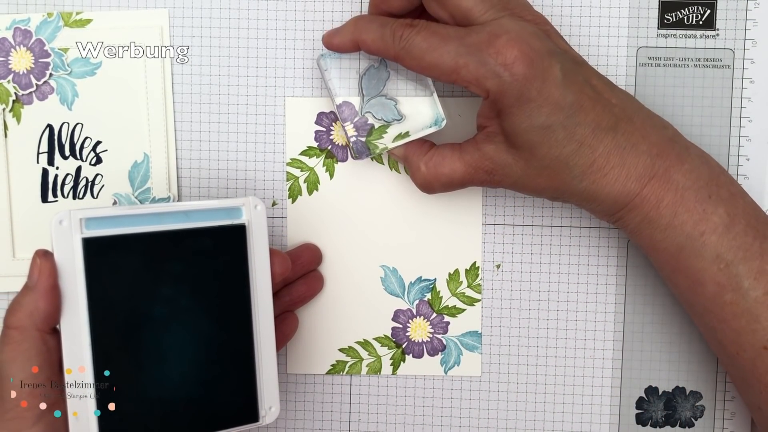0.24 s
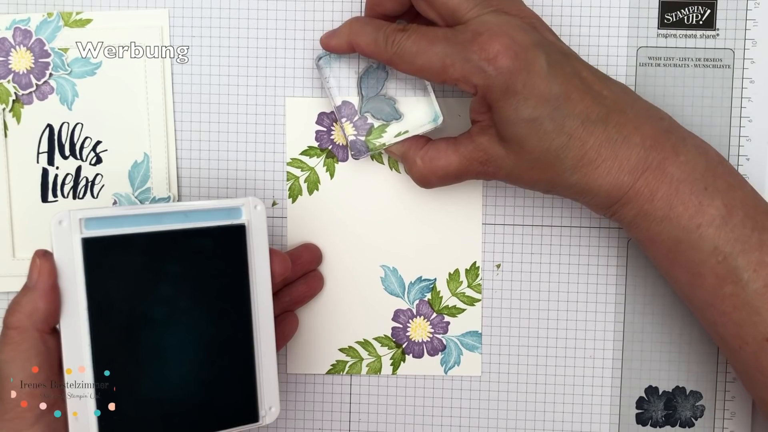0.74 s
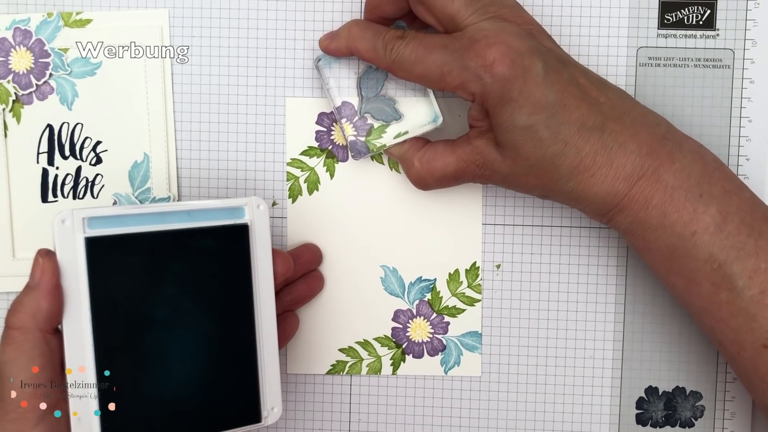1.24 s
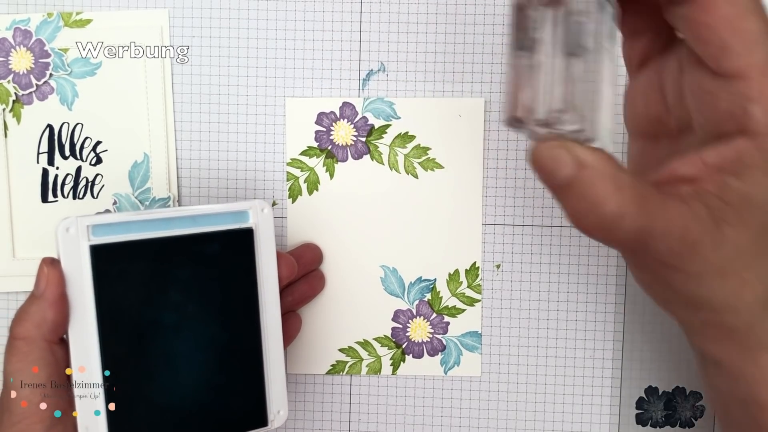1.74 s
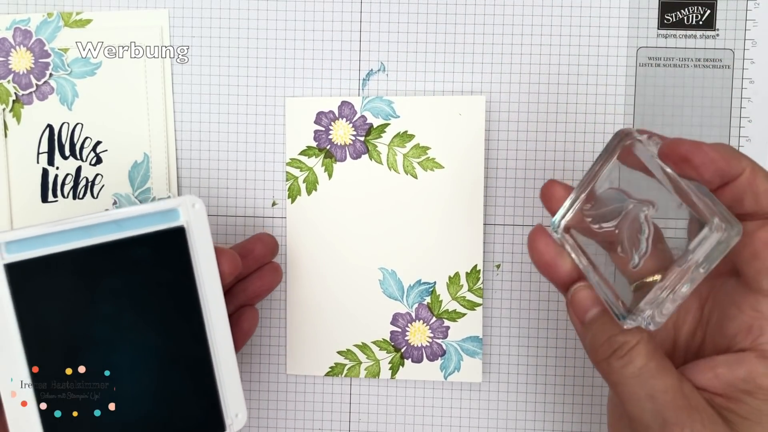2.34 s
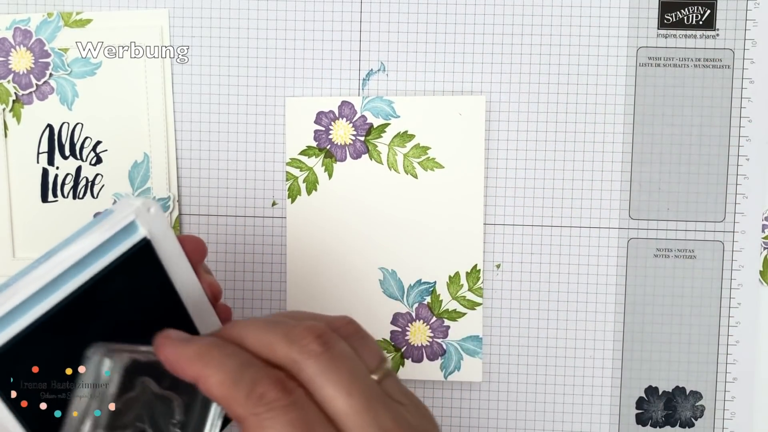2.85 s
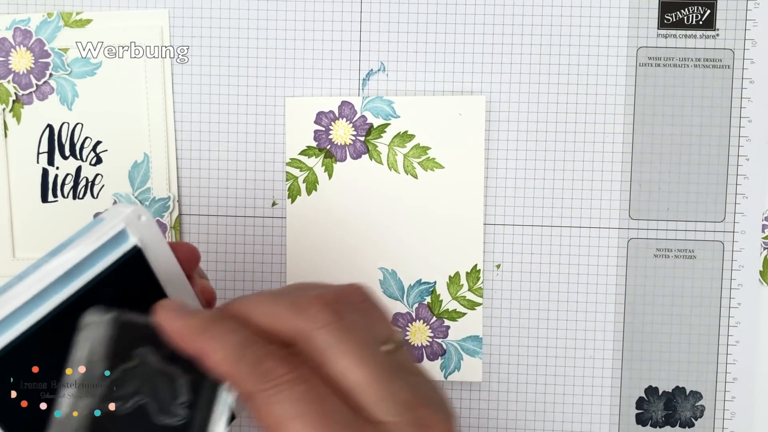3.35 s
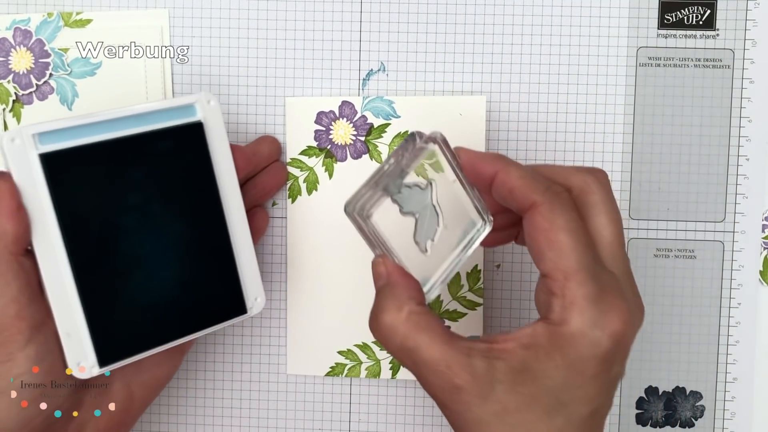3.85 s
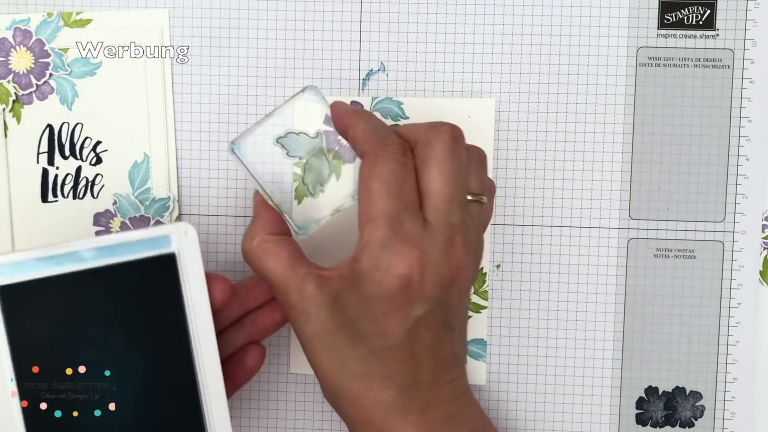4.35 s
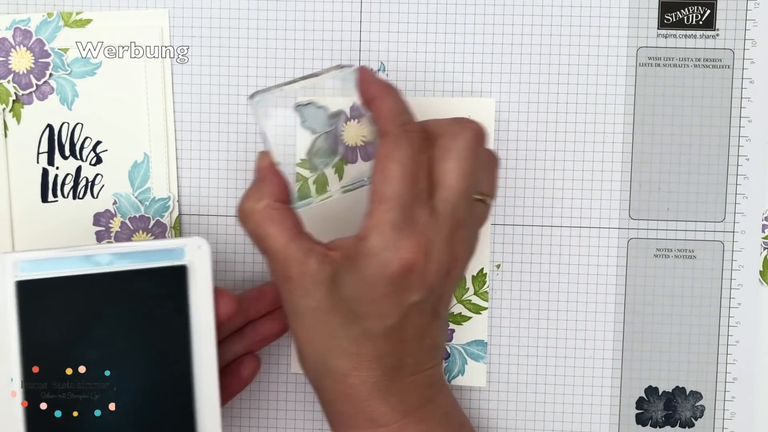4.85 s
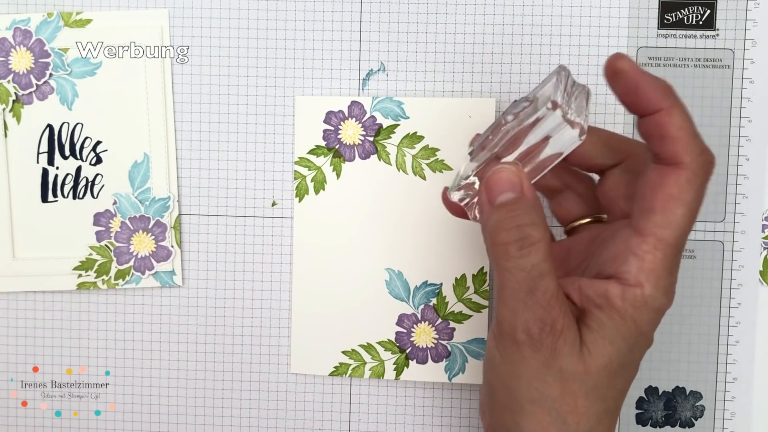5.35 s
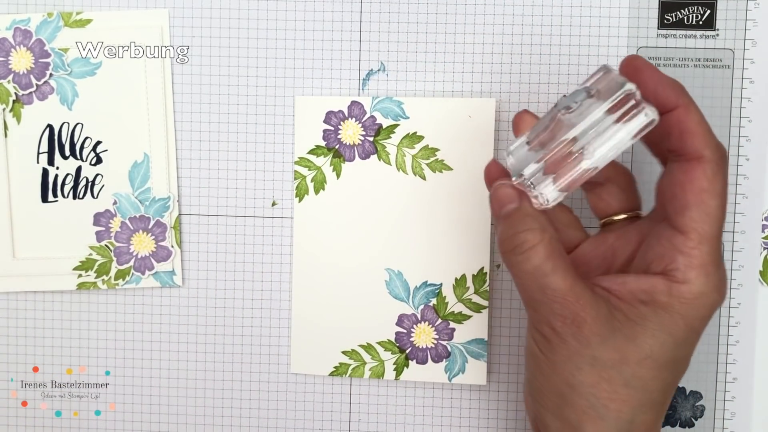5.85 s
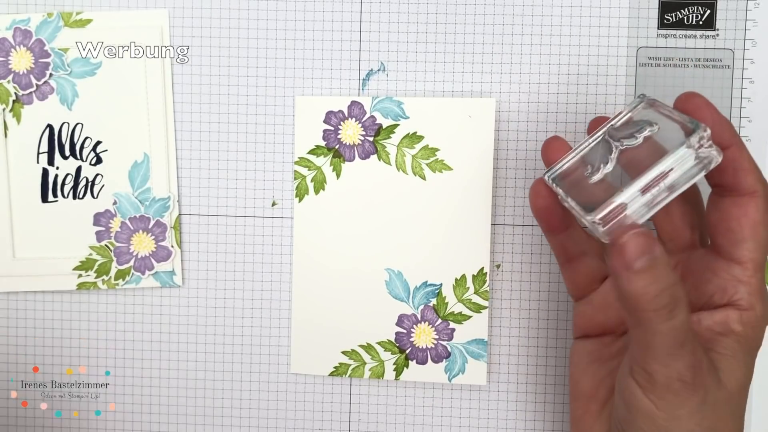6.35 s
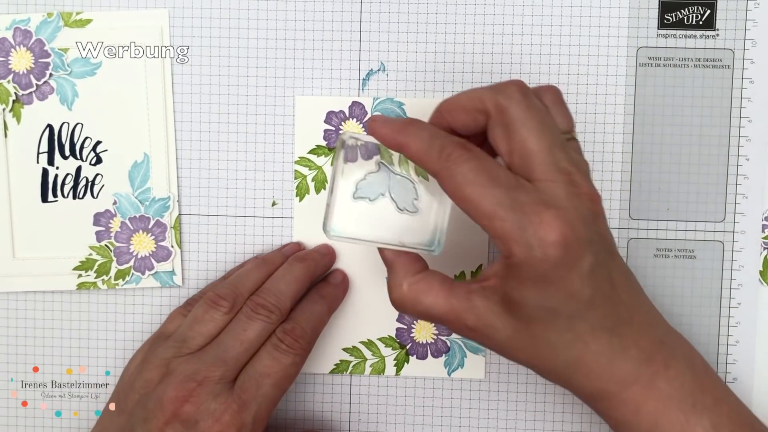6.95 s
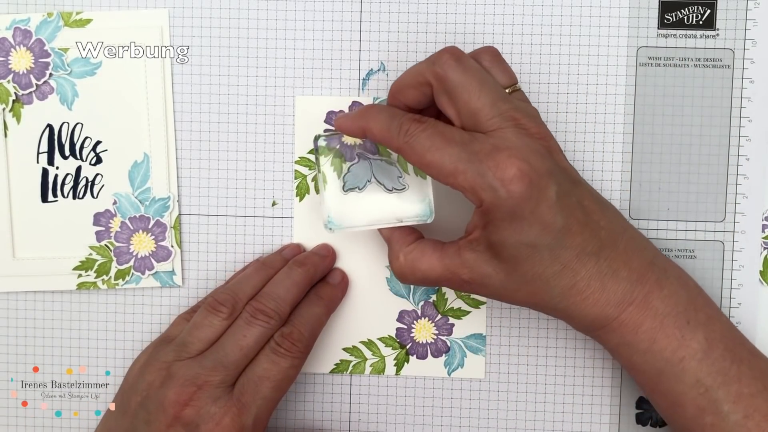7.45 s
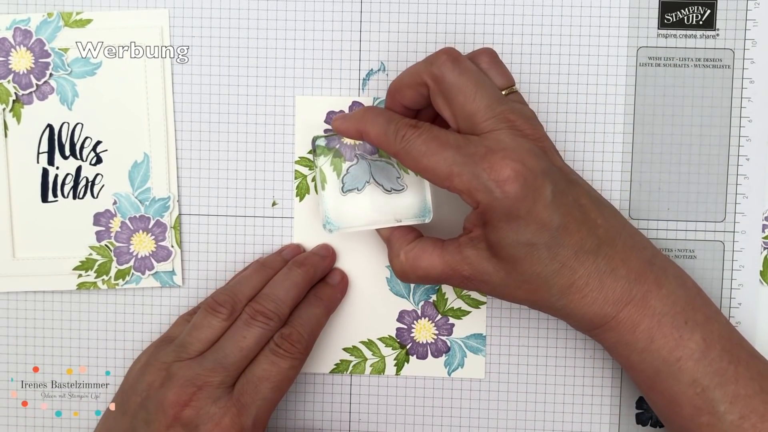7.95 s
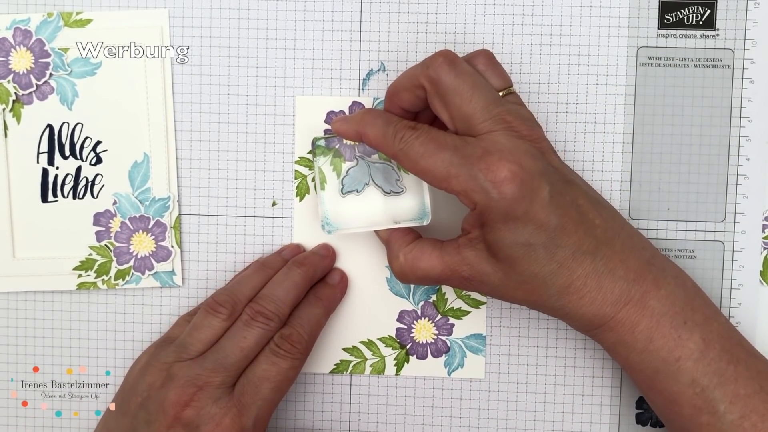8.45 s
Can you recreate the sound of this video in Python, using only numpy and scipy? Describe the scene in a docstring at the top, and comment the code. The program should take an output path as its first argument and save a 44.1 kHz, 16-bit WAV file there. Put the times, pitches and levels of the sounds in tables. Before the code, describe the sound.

A stamp block faintly taps and unsticks, then a plastic ink pad case is put down with knocks and a sharp clack.

```python
"""Rubber stamping at a craft table

A small, quiet room. Close to the microphone, a clear acrylic stamp block is peeled off cardstock,
dabbed on an ink pad and pressed down again. Further off, the plastic pad case is put aside with a few
knocks and one sharp clack, which run through the table top as bending waves, treble first."""
import sys
import numpy as np
from scipy import signal
from scipy.fft import rfft, irfft
from scipy.io import wavfile
from scipy.ndimage import uniform_filter1d

SR = 44100
rng = np.random.default_rng(int(sys.argv[2]) if len(sys.argv) > 2 else 0)


def store_wav(level_fs):
    """Save 16-bit WAV to argv[1]."""
    pcm = np.round(np.clip(np.atleast_2d(level_fs), -1, 1) * 32767)
    wavfile.write(sys.argv[1], SR, pcm.T.astype(np.int16))


N = 383348
TOP_HZ, MS = 15850, 1e-3
SIZE = 16384  # samples in which one blow is shaped
FREQ = np.maximum(np.arange(SIZE // 2 + 1) * SR / SIZE, 1)
AGE = np.arange(SIZE) / SR

# the tacky stamp lets go of the card: start_s, level_db
PEEL_SNAPS = [(1.5385, -58), (1.5935, -58), (1.5966, -48.5), (1.6009, -50), (1.6046, -30)]


def undb(db):
    """Decibels to gain."""
    return 10 ** (np.asarray(db) / 20)


def along(hz, points, values):
    """Join values by straight lines on a log-frequency axis."""
    return np.interp(np.log(hz), np.log(points), values)


def resonance(hz, width):
    """Response of one damped mode, gain 1 at its centre."""
    return 1 / (1 + 1j * (FREQ * FREQ - hz * hz) / (FREQ * width))


def body(modes):
    """Response of an object: its modes add in power, and it rings only after the blow."""
    power = sum(np.abs(undb(db) * resonance(hz, width)) ** 2 for hz, width, db in modes)
    cepstrum = irfft(np.log(power))
    return np.exp(rfft(cepstrum[:SIZE // 2], SIZE) - cepstrum[0] / 2)  # minimum phase


def bending(travel_ms):
    """Path through the table: delay falls as 1 / sqrt(f), scaled by travel_ms, and is zero at TOP_HZ."""
    khz, top_khz = FREQ / 1000, TOP_HZ / 1000
    return np.exp(-2j * np.pi * travel_ms * (2 * np.sqrt(khz) - khz / np.sqrt(top_khz)))


def contact(ms, rough):
    """Force spectrum of a touch: one push and a dying crackle of smaller ones, even across the bands."""
    crackle = rng.standard_normal(SIZE) * np.exp(-AGE / (ms * MS))
    force = 1 + rough * rfft(crackle / np.linalg.norm(crackle))
    return force / np.sqrt(uniform_filter1d(np.abs(force) ** 2, size=300))


def add(track, start_s, db, spectrum):
    """Place one blow; its level is its energy spread over 10 ms."""
    blow = irfft(spectrum)[:SIZE // 2]
    blow = blow * undb(db) * np.sqrt(10 * MS * SR) / np.linalg.norm(blow)
    start = int(start_s * SR)
    track[start:start + len(blow)] += blow[:N - start]


def tick(hz, width, ms):
    """Spectrum of a small, heavily damped click whose crackle decays over ms."""
    return resonance(hz, width) * resonance(hz, 1.5 * width) * contact(ms, rough=min(ms, 6))


def thump(hz, width):
    """Spectrum of rubber on card or foam: only the low bending waves are set going."""
    return resonance(hz, width) ** 2 * resonance(hz, 6.4 * hz) * bending(travel_ms=3.43)


def friction(start_s, end_s, db, hz, width):
    """Faint grainy friction that swells and fades with one movement."""
    out = np.zeros(N)
    count = max(int((end_s - start_s) * SR), 2)
    grains = rng.standard_normal(SIZE) * undb(3 * rng.standard_normal(SIZE))
    rub = irfft(rfft(grains) * resonance(hz, width) * resonance(hz, 4 * width))
    swell = np.sqrt(np.hanning(count))
    out[int(start_s * SR):][:count] = undb(db) * np.resize(rub / rub.std(), count) * swell
    return out


def room_tone(level_db=-64):
    """Steady low noise of the still room under an even microphone hiss."""
    # shape of the noise floor: frequency_hz, relative_density_db
    floor_shape = [(15, -44), (25, -14.5), (52, -3.5), (102, -1.5), (161, -0.5), (200, -3), (284, -2.5),
                   (316, -3.5), (382, -4), (542, -6.5), (691, -10), (1120, -14), (1430, -17), (9720, -23.5),
                   (15800, -28.5)]
    f = np.maximum(np.arange(N // 2 + 1) * SR / N, 1)
    colour = undb(along(f, *np.transpose(floor_shape)))
    noise = irfft(rfft(rng.standard_normal(N)) * colour, N)
    return undb(level_db) * noise / noise.std()


def reflections(send, gap_ms=1.6, build_ms=1.3):
    """Dense reflections of the small room build up after a short gap; the treble dies first."""
    # the room's answer: frequency_hz, level_against_send_db, t60_s
    room_decay = [(39.87, -12, 0.34), (69.4, -0.5, .36), (256, 0, 0.5), (624, -4, .40), (1430, -1.5, .48),
                  (3200, -7.5, .42), (6004, -9, .34), (9000, -12.5, 0.24), (14920, -15.5, .22)]
    hz, db, t60 = np.transpose(room_decay)
    age = np.arange(2 * SIZE) / SR
    f = np.arange(SIZE + 1) * SR / (2 * SIZE)
    noise = rfft(rng.standard_normal(2 * SIZE))
    edges = np.geomspace(30, TOP_HZ, 37)
    onset = 1 - np.exp(-np.maximum(age - gap_ms * MS, 0) / (build_ms * MS))
    echo = 0
    for lo, hi in zip(edges, edges[1:]):
        centre = np.sqrt(lo * hi)
        band_noise = irfft(noise * ((f >= lo) & (f < hi)))
        # reflections are so many that each band dies away evenly
        wash = np.cos(np.angle(signal.hilbert(band_noise)))
        band = wash * onset * np.exp(-np.log(1000) * age / along(centre, hz, t60))
        gain = np.sqrt(2 * (hi - lo) / SR) * undb(along(centre, hz, db))
        echo = echo + gain * band / np.linalg.norm(band)
    return signal.fftconvolve(send, echo)[:N]


def slides():
    """Skin hisses over a broad band and stirs the paper; the scraping case sounds in a narrow band."""
    # skin on block, card and paper mat: start_s, end_s, level_db, centre_hz
    skin_slides = [(1.717, 2.044, -71.5, 3200), (2.459, 2.74, -72, 1500), (2.623, 2.68, -64, 13000),
                   (3.71, 3.8, -68, 4200), (3.916, 4.045, -68.5, 2700), (4.674, 5.01, -69.5, 3200),
                   (5.085, 5.396, -63, 6800), (5.467, 5.973, -63, 6000), (6.729, 6.80, -64.5, 10000),
                   (7.17, 7.33, -67, 5500), (7.384, 7.58, -61.5, 6000)]
    # the pad case scrapes: start_s, end_s, level_db, centre_hz
    case_scrapes = [(3.709, 3.813, -63, 484), (5.59, 5.778, -47, 1649), (5.98, 6.041, -42, 523)]
    out = np.zeros(N)
    for start, end, db, hz in skin_slides:
        skin = friction(start, end, db, hz, width=2.1 * hz)
        paper = friction(start, end, db - 11.5, hz=1700, width=550)
        out += skin + paper
    for start, end, db, hz in case_scrapes:
        out += friction(start, end, db, hz, width=.45 * hz)
    return out


def handling_ticks():
    """The block ticks against card and fingers; the case clicks and its hollow shell answers."""
    # light contacts of the acrylic block: start_s, level_db, centre_hz, width_hz, crackle_ms
    block_ticks = [(1.539, -58.5, 1400, 900, 4), (1.801, -63.5, 1390, 2800, 2.7),
                   (1.978, -62, 2750, 2500, 17), (2.085, -59.5, 3500, 3000, 1.3),
                   (4.6682, -45, 3400, 6500, 0.92), (4.858, -63.5, 1100, 2000, 8),
                   (6.8453, -64, 5700, 1600, 2), (6.846, -56, 2200, 900, 3), (6.868, -60, 2080, 1300, 2.7),
                   (6.949, -64.5, 10000, 3500, 2)]
    # the pad case in the hand: start_s, level_db, click_hz, shell_hz, crackle_ms
    case_clicks = [(3.7064, -55, 5500, 1490, 9.4), (5.2111, -50.5, 9400, 1300, 2.6),
                   (5.2812, -57.5, 7500, 850, 2.5)]
    out = np.zeros(N)
    for start, db, hz, width, ms in block_ticks:
        add(out, start, db, tick(hz, width, ms))
    for start, db, click_hz, shell_hz, ms in case_clicks:
        add(out, start, db, tick(click_hz, width=10000, ms=ms))
        add(out, start, db - 2, tick(shell_hz, width=700, ms=1.2 * ms))
    return out


def soft_landings(relative_width=.38):
    """Presses thud through the table, and the card drops back once the stamp has let go."""
    # soft landings and presses: start_s, level_db, centre_hz
    presses = [(.851, -59.5, 400), (.864, -56.5, 362), (.915, -60, 400), (.947, -54, 374),
               (1.145, -53, 440), (3.705, -54, 417), (4.726, -53, 444), (4.917, -54.5, 320),
               (4.934, -54, 278), (6.872, -42, 442)]
    # the freed card settles: after_last_snap_s, level_db, centre_hz
    card_drops = [(0, -52.5, 263), (.004, -45, 450), (.013, -48.5, 470)]
    out = np.zeros(N)
    for start, db, hz in presses:
        add(out, start, db, thump(hz, relative_width * hz))
    last_snap_s = PEEL_SNAPS[-1][0]
    for lag, db, hz in card_drops:
        add(out, last_snap_s + lag, db, thump(hz, relative_width * hz))
    return out


def inking():
    """Each dab lands with a wet tick and a thud, then lifts with a tacky crackle and a snap."""
    # the stamp on the ink pad: press_s, press_db, lift_s, lift_db, snap_hz
    dabs = [(2.967, -51.5, 3.0726, -54.5, 1510), (3.157, -54, 3.266, -56, 950),
            (3.314, -60, 3.412, -55.5, 1010)]
    out = np.zeros(N)
    for dab, (press, press_db, lift, lift_db, snap_hz) in enumerate(dabs):
        wet_db = -55 - 3.5 * dab  # softer with each dab
        add(out, press, wet_db, tick(hz=1000, width=1020, ms=3.4))
        add(out, press, press_db, thump(hz=323, width=220))  # thud in the foam
        add(out, press, press_db + 1.5, thump(hz=83, width=44))  # boom in the table
        add(out, lift, lift_db, tick(snap_hz, width=1.02 * snap_hz, ms=3.7))
        # the ink crackles as it stretches before the snap and releases after it
        out += friction(lift - .024, lift + .017, lift_db - 6.5, snap_hz, width=1.4 * snap_hz)
    return out


def peel():
    """The stamp unsticks in a quick run of snaps -> (sound at the microphone, send to the room)."""
    # block and card as they part: mode_hz, width_hz, relative_db
    block_modes = [(1180, 150, -12.5), (1690, 110, -12), (2810, 180, -4), (3250, 400, -5), (3950, 220, -9),
                   (5720, 280, -7), (6670, 230, -6.5), (9110, 1000, -16.5), (12600, 1700, -18)]
    block = body(block_modes)
    snap = block * bending(travel_ms=1.42)
    direct, send = np.zeros(N), np.zeros(N)
    for start, db in PEEL_SNAPS:
        add(direct, start, db, snap * contact(ms=2.2, rough=1.1))
        add(send, start, db, snap)
    return direct, send


def pad_case(spot_db=5.5):
    """Each knock rings the plastic case and the table -> (sound at the microphone, send to the room)."""
    # the case meets the table: start_s, level_db, contact_corner_hz, spot_resonance_hz, bass_shelf_db
    knocks = [(5.5567, -18, 2597, 780.4, -10), (5.5787, -28.5, 3200, 1500, -11.5),
              (5.6924, -29.5, 1150, 551.6, -8.5), (5.7206, -34, 1000, 1645, -8),
              (5.794, -33.5, 6000, 7900, -7), (5.7995, -28.5, 500, 620, -7),
              (5.9265, -54.5, 2500, 2996, -4.5), (5.976, -38, 800, 461.8, -5.5),
              (6.0125, -36, 1200, 840, -5.5), (6.0267, -35.5, 1697, 1306, -5),
              (6.0383, -7, 7500, 3420, -.5), (6.0803, -16, 7000, 1600, -6)]
    # case and table top together: mode_hz, width_hz, relative_db
    case_modes = [(67.4, 12, -1.5), (125, 31, 0.5), (245.6, 70, 1), (306.3, 28, -0.5), (460, 90, -4.5),
                  (620, 190, -1), (790, 160, 0), (1077, 90, -2), (1300, 120, -3), (1490, 130, -1.5),
                  (1850, 240, -3.5), (2227, 260, -5.5), (2740, 360, -4), (3130, 330, -3), (3857, 190, -4.5),
                  (4320, 280, -6), (4860, 310, -7), (5460, 730, -3), (6340, 830, -12), (7300, 600, -8.5),
                  (8345, 1100, -4.5), (10100, 460, -9.5), (11900, 1200, -7.5), (13990, 2500, -13)]
    case = body(case_modes)
    direct, send = np.zeros(N), np.zeros(N)
    for start, db, corner_hz, spot_hz, bass_db in knocks:
        # a harder contact is brighter, and each spot favours its own resonance
        push = 1 / (1 + 1j * FREQ / corner_hz) / (1 + 1j * FREQ / (3 * corner_hz))
        spot = 1 + (undb(spot_db) - 1) * resonance(spot_hz, 0.19 * spot_hz)
        weight = 1 + (undb(bass_db) - 1) / (1 + 1j * FREQ / 400)
        blow = case * push * spot * weight
        path = bending(travel_ms=4.4 + 0.2 * bass_db)  # a heavier, bassier landing draws its thud out
        # the shell cracks at once; the lows come later, through the table
        shell = contact(ms=2.7, rough=1.0) * (1j * FREQ / (1j * FREQ + 900)) ** 2
        table = path * contact(ms=7.9, rough=.35) / (1 + 1j * FREQ / 2400)
        add(direct, start, db, blow * (table + undb(-3.5) * shell))
        add(send, start, db, blow * path)
    return direct, send


def scene():
    """The stamp works right under the microphone; the case lands further off, with more room on it."""
    knocks, knocks_send = pad_case()
    snaps, snaps_send = peel()
    handling = handling_ticks() + slides()
    soft = soft_landings() + inking()
    echo = reflections(knocks_send + undb(-5.5) * snaps_send + undb(-3) * handling + undb(-6.5) * soft)
    return (knocks + snaps + handling + soft + echo + room_tone())[None]


def record(dry):
    """The mono microphone rounds the loudest clack, then cuts the deepest bass and the top."""
    rounded = dry / (1 + (dry / .95) ** 4) ** (1 / 4)
    low_cut = signal.butter(2, 42, "highpass", fs=SR, output="sos")
    high_cut = signal.ellip(12, .2, 80, TOP_HZ, fs=SR, output="sos")
    return signal.sosfilt(high_cut, signal.sosfilt(low_cut, rounded))


dry = scene()
out = record(dry)
store_wav(out)
```